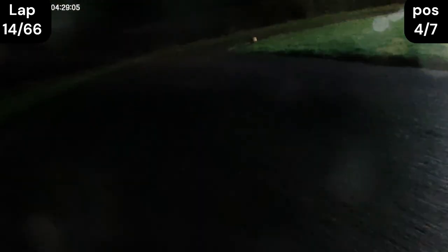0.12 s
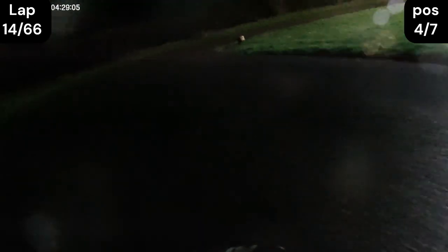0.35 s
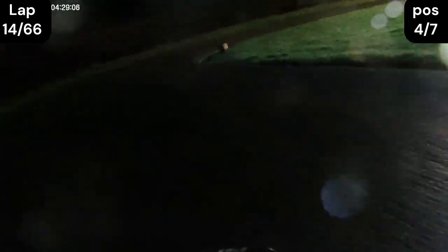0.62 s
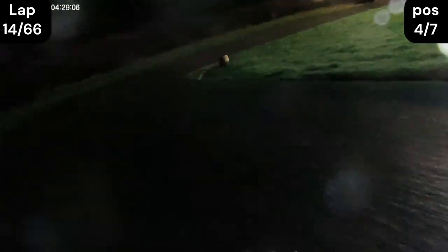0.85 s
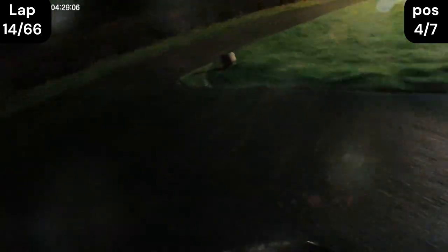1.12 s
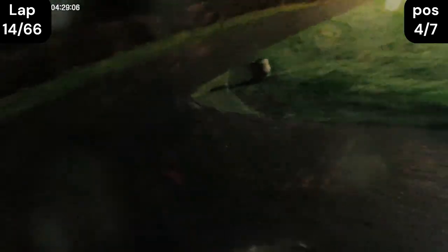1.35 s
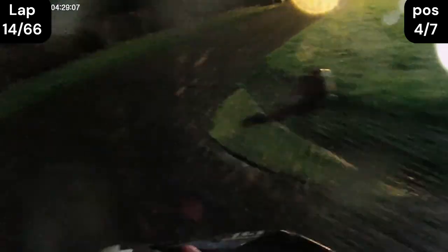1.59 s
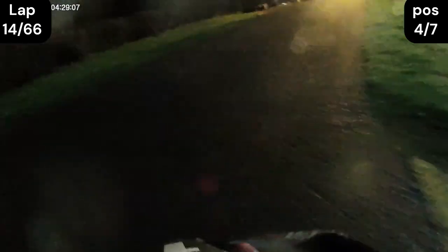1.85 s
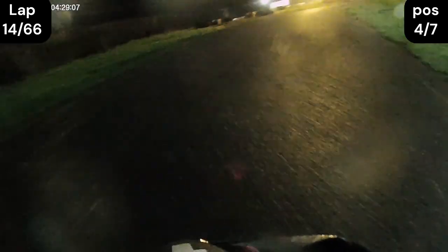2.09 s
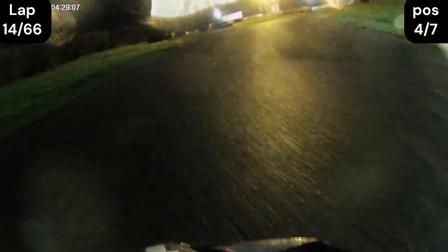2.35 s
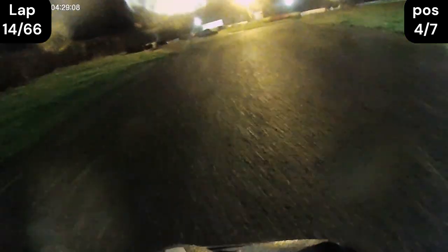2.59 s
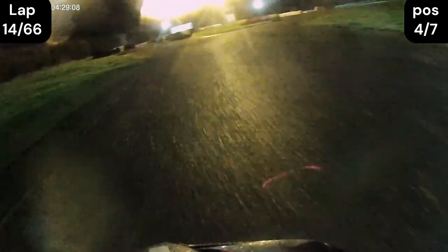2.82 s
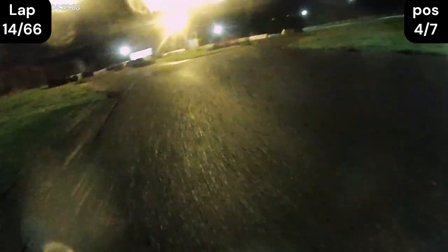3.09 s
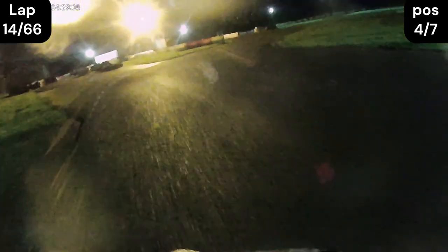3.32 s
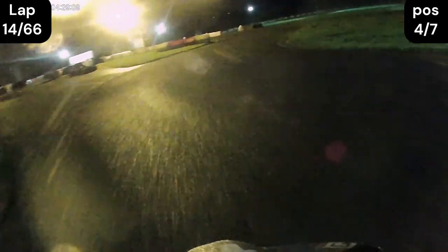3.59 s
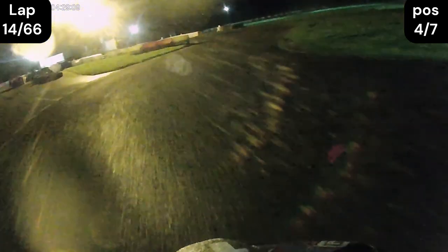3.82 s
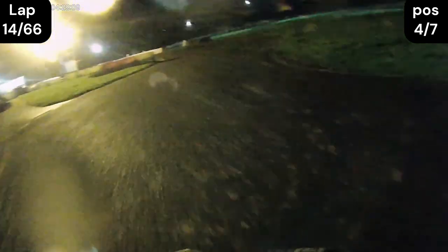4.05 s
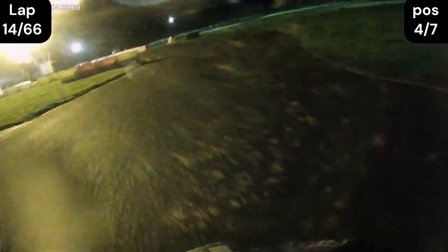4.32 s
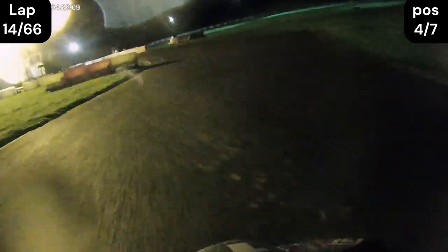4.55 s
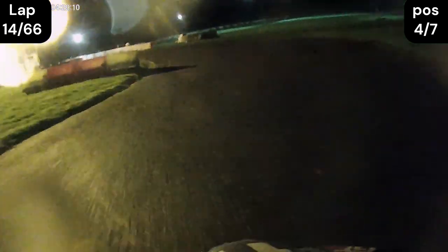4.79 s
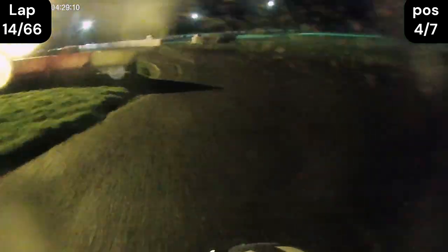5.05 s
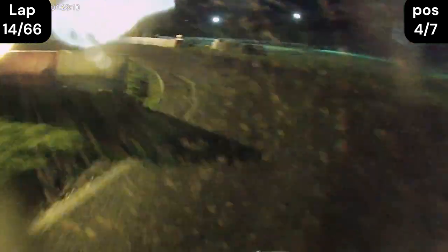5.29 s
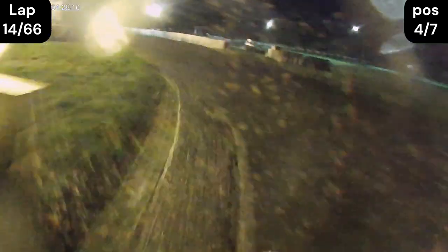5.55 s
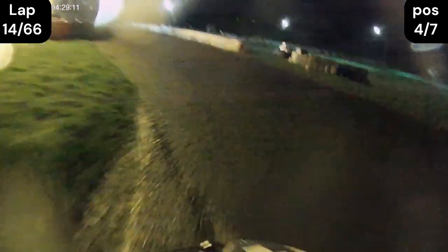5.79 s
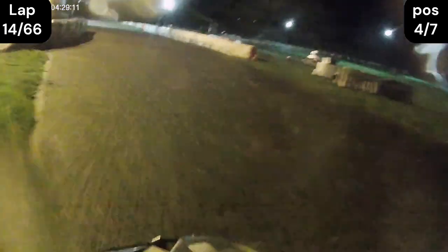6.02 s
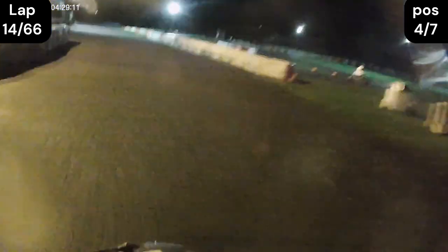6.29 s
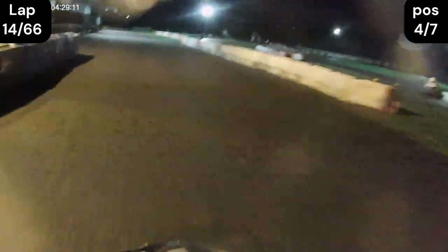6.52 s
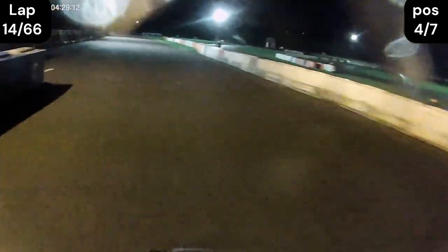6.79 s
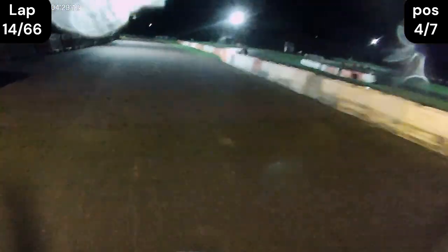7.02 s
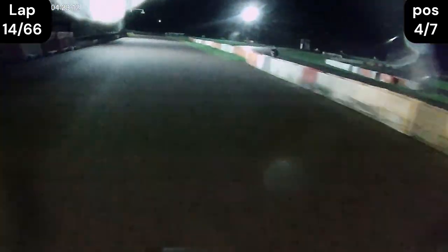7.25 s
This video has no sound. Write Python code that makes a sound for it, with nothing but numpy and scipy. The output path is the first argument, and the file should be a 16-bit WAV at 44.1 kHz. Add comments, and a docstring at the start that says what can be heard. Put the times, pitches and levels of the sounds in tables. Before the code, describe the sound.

From a sealed camera aboard a kart on a wet outdoor track at night, a small four-stroke engine throbs low and steady under muffled tyre roar and wind buffeting. Its note dips briefly, recovers, then climbs on the exit as the chain whine rises. Deep jolts thump through the seat, crowding the second half and overloading the loudest moments.

```python
"""A single-cylinder four-stroke kart on a wet track, heard by a sealed helmet camera on board.
Each firing is a pressure pulse that rings the exhaust; sines add the frame's throb and the chain's whine,
which climbs to the engine's speed as the clutch grips. Shaped noise makes wind, bumps, tyre roar and spray,
firings knock ringing modes of the casing, and jolts ring the seat; the loudest thumps overload the input."""
import sys
import numpy as np
from scipy import signal
from scipy.fft import rfft, irfft, next_fast_len
from scipy.io import wavfile
from scipy.ndimage import uniform_filter1d

SR = 44100
rng = np.random.default_rng(int(sys.argv[2]) if len(sys.argv) > 2 else 0)


def log_audio(samples):
    """Write samples as a 16-bit WAV file to the path given in sys.argv[1]."""
    # one column per channel
    frames = np.atleast_2d(samples).T
    # limit to full scale, then quantise
    limited = np.clip(frames, -1, 1)
    pcm = np.round(limited * 32767).astype(np.int16)
    wavfile.write(sys.argv[1], SR, pcm)


def boost(x):
    """Linear amplitude factor 10**(x/20) for a level x in decibels (scalar or array-like)."""
    u = np.asarray(x, float) / 20
    return 10 ** u


N = 325899
T = np.arange(N) / SR

# Spray hiss spectrum. Each row: frequency in Hz, relative density in dB per Hz.
HISS_SPECTRUM = [(2000, -22), (2700, -5.5), (3100, -1), (3400, -2.5), (3850, 0.5), (4400, -3.5),
                 (5300, -8.5), (5600, -9), (5900, -6.5), (6600, -8.5), (7200, -18), (8500, -27),
                 (9300, -28.5), (9700, -37), (12000, -37.5), (15000, -43.5)]
# Tyre roar spectrum. Each row: frequency in Hz, relative density in dB per Hz.
ROAR_SPECTRUM = [(150, -13), (250, -1.5), (350, -6), (500, -7), (650, -9.5), (850, -6), (1000, -7.5),
                 (1150, -6), (1300, 1.5), (1500, -8.5), (1800, -9), (2100, -16.5), (2400, -15.5),
                 (2800, -30), (3500, -44)]
# Housing resonances that lift the roar. Each row: centre in Hz, width in Hz, lift in dB.
HOUSING_PEAKS = [(1011, 76, 6.5), (1190, 98, 2), (1910, 64, 4)]
# Casing modes, each rung through two equal resonators. Each row: frequency in Hz, width of one resonator
# in Hz, level against the roar in dB at the middle firing rate, dB gained per Hz of firing rate.
CASING_MODES = [(961.4, 71, -18, 0.8), (1033, 102, -13.5, 0.47), (1177, 91, -12.5, 0.41),
                (1296, 62, -11.5, -0.4), (1558, 120, -13.5, 0.2), (1767, 123, -13.5, -0.22)]
# Road noise. Each row: time in seconds, roar level in dB, hiss level relative to the roar in dB.
ROAD_LEVELS = [(0, -21.5, -17), (.5, -20, -17), (1, -21.5, -19), (1.56, -19.5, -16.5), (1.95, -20.5, -19),
               (2.3, -20, -19), (3.07, -19, -19.5), (4.2, -18.5, -19.5), (4.85, -20, -19.5),
               (5.4, -18, -17.5), (6.2, -19.5, -18), (6.75, -18, -17.5), (7.39, -20.5, -16.5)]
# Brief dips of roar and hiss together. Each row: centre in seconds, level change in dB.
ROAD_DIPS = [(.14, 0), (2.15, -6), (2.6, -2.5), (3.171, -5.5), (3.759, -2), (4.801, -3), (5.518, -3),
             (5.892, -6), (6.36, -5.5), (6.927, -6.5), (7.25, -2.5)]

# Wind buffeting spectrum. Each row: frequency in Hz, relative density in dB per Hz.
BUFFET_SPECTRUM = [(4, -11), (8, 0), (12, -1), (17, -4), (22, 0), (36, -2), (45, -7), (68, -13)]
# Seat boom spectrum. Each row: frequency in Hz, relative density in dB per Hz.
BOOM_SPECTRUM = [(40, -22.5), (60, -3), (85, 0.5), (95, -5), (106, 2), (120, -12.5), (150, -32.5)]
# Frame thump spectrum. Each row: frequency in Hz, relative density in dB per Hz.
THUMP_SPECTRUM = [(90, -30), (130, 5), (160, 3), (210, 6), (250, -5.5), (400, -11.5), (700, -38.5)]
# Wind and bumps. Each row: time in seconds, buffeting level in dB, seat boom in dB, thump in dB.
WIND_LEVELS = [(0, -12, -20.5, -25), (.6, -17, -23, -23.5), (1.2, -11.5, -23.5, -29.5),
               (1.6, -12.5, -24.5, -30.5), (1.9, -12, -30, -28.5), (2.6, -13, -19, -29.5),
               (3.2, -12.5, -23.5, -20), (3.7, -12, -19.5, -21), (4.2, -16, -13.5, -15.5),
               (4.65, -16, -20, -22), (4.95, -15.5, -14, -17.5), (5.2, -16, -14.5, -14),
               (5.45, -13, -17.5, -18), (5.7, -12.5, -16.5, -17), (5.95, -14.5, -11.5, -16),
               (6.2, -16, -13.5, -18.5), (6.6, -10, -15, -16), (7, -16, -10.5, -13.5),
               (7.39, -12, -7.5, -18.5)]

# Seat modes. Each row: nominal frequency in Hz, 60 dB decay time in seconds, relative level in dB.
SEAT_MODES = [(83.3, 0.21, 0.5), (105, 0.28, -7)]
# Hard jolts to the seat. Each row: time in seconds (just after the onset), strength in dB.
SEAT_JOLTS = [(3.489, -5), (3.84, -9), (3.92, -3), (4.01, 0), (4.082, -7), (4.17, 2), (4.281, -1.5),
              (4.488, -5.5), (4.619, -7.5), (5.25, 2), (5.389, 1), (5.439, -7), (5.597, -6.5),
              (5.699, -8.5), (5.838, -7), (6.069, 0), (6.39, -3), (6.475, -0.5), (6.764, -1.5),
              (6.839, 2.5), (6.869, 1.5), (7.01, 1.5), (7.186, -6.5)]

# Engine speed. Each row: time in seconds, firing rate in Hz.
FIRING_RATE = [(0, 26.6), (.3, 27.05), (.56, 27), (.75, 26), (.88, 25.3), (1, 25.35), (1.15, 26.2),
               (1.36, 26.95), (1.7, 27.25), (2.3, 27), (2.9, 27), (3.2, 26.6), (3.6, 27), (4, 27.3),
               (4.55, 28.85), (5.15, 30.7), (5.95, 33.35), (6.3, 33.5), (6.55, 33.7), (7, 34.6),
               (7.39, 35.5)]
# The low, middle and top firing rates, in Hz, at which levels below are given.
REVS_HZ = (25.4, 27.1, 34)

TEETH = 14  # on the drive sprocket
# Chain pitch while the clutch slips. Each row: time in seconds, tooth mesh rate in Hz.
SLIP_PITCH = [(0, 655), (1.35, 658), (1.75, 690), (2.7, 698), (3, 713), (3.4, 733), (3.6, 750), (3.85, 752),
              (4.05, 770), (7.39, 1191)]
# Chain whine. Each row: time in seconds, mesh tone level in dB, level in dB of the line one firing rate
# above it, overtone level in dB.
CHAIN_LEVELS = [(0, -55, -60, -33), (.5, -55, -60, -28.5), (1.1, -55, -60, -31), (1.5, -55, -60, -35),
                (1.85, -55, -60, -31), (2.6, -48, -60, -31), (3, -34, -55, -38), (3.8, -34, -50, -32),
                (4.3, -35, -38, -33), (4.6, -30, -34, -34), (5, -31.5, -37, -38), (5.2, -30.5, -33, -34),
                (5.5, -30.5, -40, -32), (5.9, -36, -38, -38), (6.2, -38, -42, -39), (6.5, -29, -37, -35),
                (6.75, -27, -28, -34), (6.95, -33, -26, -38), (7.15, -30, -27, -40), (7.39, -26, -36, -42)]
# Lines beside the mesh tone, from each firing tugging the gripped chain. Each row: offset in firing rates,
# level against the mesh tone in dB at the middle rate, the same at the top rate.
CHAIN_TUGS = [(-2, -20, -4), (-1, -11, -9), (2, -5, -8)]

# Exhaust resonances, each rung through two equal resonators. Each row: frequency in Hz, width of one
# resonator in Hz, relative level in dB.
PIPE_MODES = [(163, 40, -2), (218, 40, -7), (272, 40, -3), (345, 60, -4), (420, 60, -6), (900, 500, -14)]
# Exhaust and frame. Each row: time in seconds, rasp level in dB, then the frame's throb in dB at one, two
# and three times the firing rate.
EXHAUST_LEVELS = [(0, -33.5, -14.5, -22, -20), (1.2, -31.5, -29.5, -16.5, -22.5),
                  (1.7, -27, -22, -25.5, -25.5), (2.2, -33.5, -15, -20, -24),
                  (2.7, -35, -24.5, -21.5, -21.5), (3.2, -34.5, -24.5, -18, -25.5),
                  (3.7, -38, -17, -14, -21), (4.2, -33, -15, -23.5, -19.5), (4.7, -44, -9, -19.5, -20),
                  (5.2, -29.5, -16.5, -22.5, -15.5), (5.7, -32.5, -29, -27, -18),
                  (6.2, -38, -27.5, -23, -21), (7.39, -36, -25, -28, -23.5)]
# Firing harmonics that stand out as clean lines. Each row: multiple of the firing rate, level in dB at the
# low, middle and top rates.
CLEAN_HARMONICS = [(6, -34, -36, -33), (9, -45, -50, -31), (10, -43, -34, -32), (11, -48, -46, -38),
                   (12, -45, -41, -47), (13, -38, -32, -44), (14, -44, -43, -38), (15, -45, -41, -40),
                   (16, -44, -41, -46), (17, -35, -45, -45), (18, -32, -34, -55), (19, -46, -44, -45),
                   (31, -50, -43, -42), (34, -50, -46, -36), (39, -45, -45, -36)]


def level(x, db):
    """Scale to an rms level in dB."""
    return x * boost(db) / np.sqrt(np.mean(x ** 2))


def curves(table):
    """Every column after the time as a value per sample."""
    seconds, *columns = np.transpose(table)
    return [np.interp(T, seconds, column) for column in columns]


def walk(rate, count=16):
    """Random levels held 1 / rate seconds and slewed twice; spread near 1."""
    held = np.repeat(rng.standard_normal(int(N / SR * rate) + 2), count)
    slewed = uniform_filter1d(uniform_filter1d(held, count), count)
    return 1.28 * np.interp(T * rate * count, np.arange(len(held)), slewed)


def colour(x, points, peaks=()):
    """Shape a spectrum by (Hz, dB) points and resonant lifts; rms 1."""
    size = next_fast_len(N)
    f = np.fft.rfftfreq(size, 1 / SR) + 1  # 1 Hz up, to keep the log finite
    hz, db = np.transpose(points)
    shape = np.interp(np.log(f), np.log(hz), db, left=-90, right=-90)
    for centre, width, lift in peaks:
        shape = shape + lift / (1 + (2 * (f - centre) / width) ** 2)
    return level(irfft(rfft(x, size) * boost(shape), size)[:N], 0)


def ring_twice(x, hz, width):
    """Two equal resonators in a row, gain 1 at their centre."""
    resonator = signal.iirpeak(hz, hz / width, fs=SR)
    return signal.lfilter(*resonator, signal.lfilter(*resonator, x))


def tone(turns, db, waver_db, rate, drift=.4):
    """A sine about an rms level of db, whose level and phase (drift, radians) waver at random."""
    gain = np.sqrt(2) * boost(db + waver_db * walk(rate))
    phase = 2 * np.pi * turns + 6 * rng.random() + drift * walk(rate)
    return gain * np.sin(phase)


def hiss(db, turns, puff=0.28, tick=0.13, decay=0.34):
    """Spray hiss, with a puff of gas at every firing and valve clatter at every crank turn."""
    puffs = puff * np.exp(-(turns % 1) / decay)  # decay in firing intervals
    ticks = tick * np.exp(-((2 * turns + 0.29) % 1) / decay)  # decay in crank turns
    flutter = boost(1.68 * walk(300) + 0.65 * walk(13))
    noise = rng.standard_normal(N) * (1 + puffs + ticks) * flutter
    return boost(db) * colour(noise, HISS_SPECTRUM)


def roar(db, firing_hz, turns, gate=0.053, knock=0.6, flicker_db=1.8):
    """Tyres roar in the housing's resonances; each firing knocks the casing, whose modes flicker alone."""
    flutter = boost(1.54 * walk(150) + 0.47 * walk(25))
    pulsing = 1 + gate * np.cos(2 * np.pi * turns)
    tyres = colour(rng.standard_normal(N) * pulsing * flutter, ROAR_SPECTRUM, HOUSING_PEAKS)
    clatter = rng.standard_normal(N) * (1 + knock * np.exp(-(turns % 1) / 0.3))
    revs = firing_hz - REVS_HZ[1]
    casing = np.zeros(N)
    for hz, width, mode_db, db_per_hz in CASING_MODES:
        mode = level(ring_twice(clatter, hz, width), mode_db)
        casing += boost(flicker_db * walk(7) + db_per_hz * revs) * mode
    return boost(db) * (tyres + casing)


def wind(buffet_db, boom_db, thump_db):
    """Slow buffeting on the housing; bumps boom in the seat and thump through the frame."""
    gusts = boost(walk(6))
    buffet = colour(rng.standard_normal(N) * gusts, BUFFET_SPECTRUM)
    bumps = boost(1.4 * walk(22) + walk(9))  # shared by boom and thump
    boom = colour(rng.standard_normal(N) * bumps, BOOM_SPECTRUM)
    thump = colour(rng.standard_normal(N) * bumps, THUMP_SPECTRUM)
    return boost(buffet_db) * buffet + boost(boom_db) * boom + boost(thump_db) * thump


def jolts(rise_s=0.0061):
    """Each jolt swings the seat up or down; its modes take unequal shares and ring out."""
    out, t = np.zeros(N + SR), T[:SR // 2]
    for seconds, db in SEAT_JOLTS:
        angle = 2 * np.pi * rng.random()
        detune = 1 + 0.049 * (rng.random() - .5)  # shared by both modes
        start = int((seconds - rise_s) * SR)
        for (hz, t60, mode_db), share in zip(SEAT_MODES, (np.cos(angle), np.sin(angle))):
            fade = (1 - np.exp(-t / rise_s)) * boost(db + mode_db - 60 * t / t60)
            out[start:start + len(t)] += share * fade * np.sin(2 * np.pi * hz * detune * t)
    return out[:N]


def chain(firing_hz, turns, slack_db=-150):
    """Sprocket teeth meet the chain; once the clutch grips they follow the crank, two turns a firing."""
    locked_hz = 2 * TEETH * firing_hz
    mesh_hz = np.minimum(curves(SLIP_PITCH)[0], locked_hz)
    mesh = np.cumsum(mesh_hz) / SR
    first_db, above_db, second_db = curves(CHAIN_LEVELS)
    whine = tone(mesh, first_db, 1, 8, drift=.25)
    whine += tone(mesh + turns, above_db, 1, 6, drift=.2)
    whine += tone(2 * mesh, second_db, 1.5, 12, drift=.5)
    # slip softens the tugs
    slip_db = slack_db * (1 - mesh_hz / locked_hz)
    for k, *ends in CHAIN_TUGS:
        tug_db = first_db + slip_db + np.interp(firing_hz, REVS_HZ[1:], ends)
        whine += tone(mesh + k * turns, tug_db, 2, 4, drift=.3)
    # the overtone gets a line on either side
    for k in (-1, 1):
        whine += tone(2 * mesh + k * turns, second_db + slip_db - 3, 2, 6)
    return whine


def exhaust(firing_hz, turns, rasp_db, *throb_db, scatter_db=1.75, smear_s=0.016):
    """One pressure pulse per firing, each of its own strength, rings the pipe and shakes the frame."""
    cycle = turns.astype(int)
    strength = boost(scatter_db * rng.standard_normal(N // 500))  # more than enough firings
    pulses = np.diff(cycle, prepend=0) * strength[cycle]
    # echoes inside the silencer draw each pulse out
    echoes = rng.standard_normal(SR // 10) * np.exp(-T[:SR // 10] / smear_s)
    push = signal.fftconvolve(pulses, echoes)[:N]
    rasp = np.zeros(N)
    for i, (hz, width, db) in enumerate(PIPE_MODES):
        rasp += (-1) ** i * level(ring_twice(push, hz, width), db)  # neighbours in opposite polarity
    out = boost(rasp_db) * level(rasp, 0)
    for k, db in enumerate(throb_db, start=1):
        out += tone(k * turns, db, 1.76, 9)
    for k, *ends in CLEAN_HARMONICS:
        out += tone(k * turns, np.interp(firing_hz, REVS_HZ, ends), 1.6, 5, drift=.3)
    return out


def scene():
    """All sources at the one microphone."""
    firing_hz = curves(FIRING_RATE)[0]
    turns = np.cumsum(firing_hz) / SR  # one turn per firing
    roar_db, hiss_db = curves(ROAD_LEVELS)
    roar_db = roar_db + 0.13 * walk(7.1)
    for seconds, db in ROAD_DIPS:
        roar_db += db * np.exp(-.5 * ((T - seconds) / 0.016) ** 2)  # bell-shaped, 16 ms spread
    road = hiss(roar_db + hiss_db, turns) + roar(roar_db, firing_hz, turns)
    bumps = wind(*curves(WIND_LEVELS)) + jolts()
    engine = chain(firing_hz, turns) + exhaust(firing_hz, turns, *curves(EXHAUST_LEVELS))
    return (road + bumps + engine)[None]


def low_pass(x):
    """Removes everything above the highest recorded frequency."""
    return signal.sosfilt(signal.butter(12, 15700, fs=SR, output="sos"), x)


def record(dry, knee=0.92, bend=0.4, floor_db=-69):
    """The input rounds off above a knee, then clips flat; the preamp hisses faintly."""
    over = np.clip(np.abs(dry) - knee, 0, .5 / bend)
    rounded = dry - np.sign(dry) * bend * over ** 2
    preamp_hiss = boost(floor_db) * rng.standard_normal(dry.shape)
    return low_pass(np.clip(rounded, -1, 1) + preamp_hiss)


dry = scene()
out = record(dry)
log_audio(out)
```